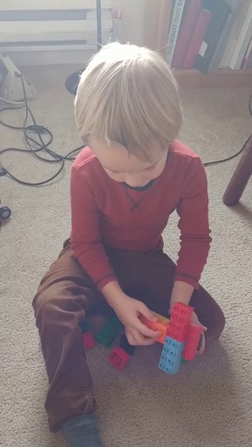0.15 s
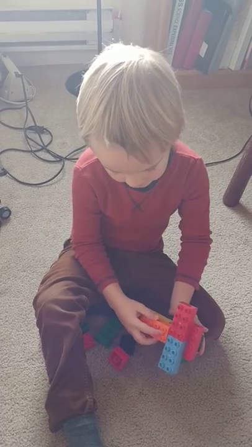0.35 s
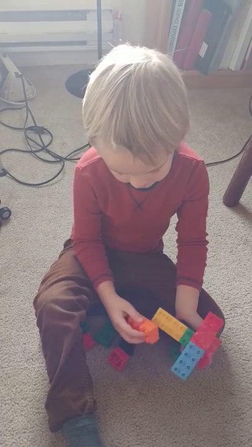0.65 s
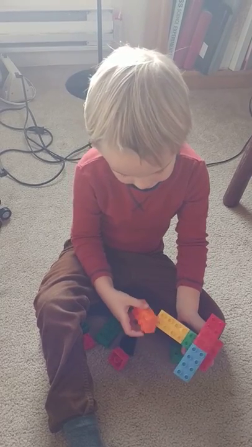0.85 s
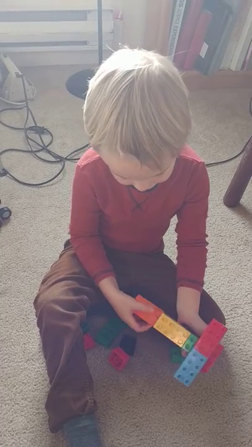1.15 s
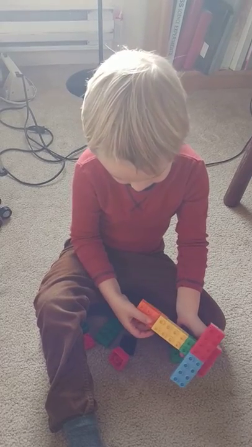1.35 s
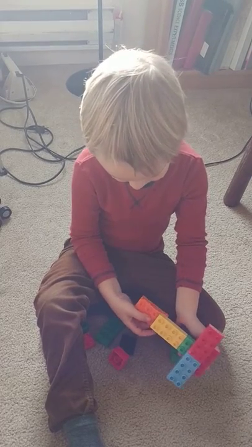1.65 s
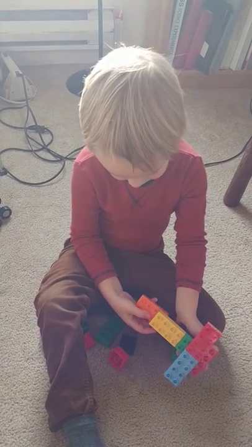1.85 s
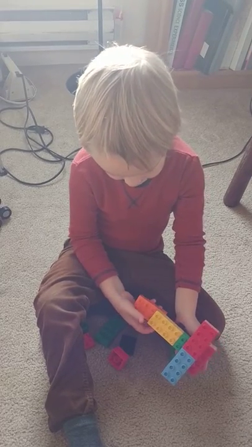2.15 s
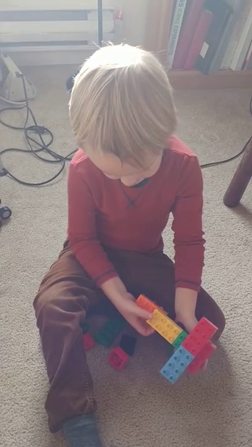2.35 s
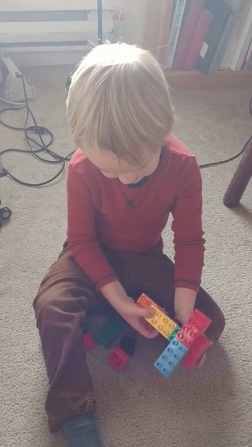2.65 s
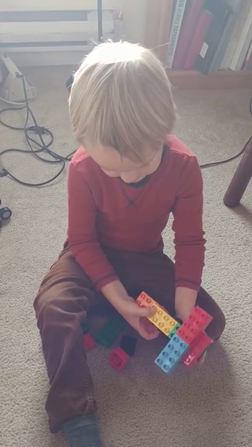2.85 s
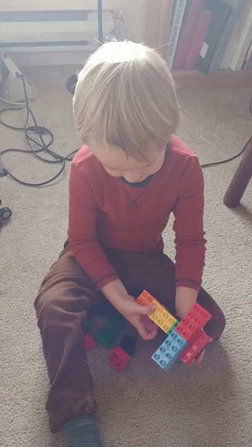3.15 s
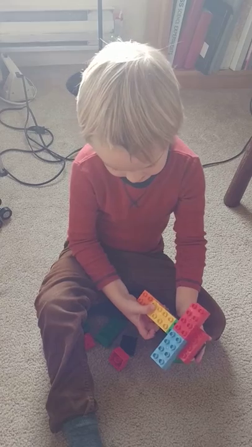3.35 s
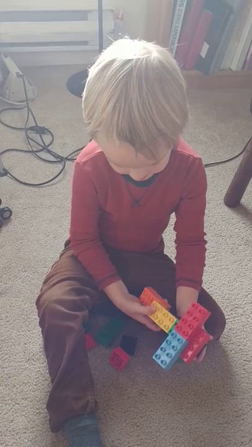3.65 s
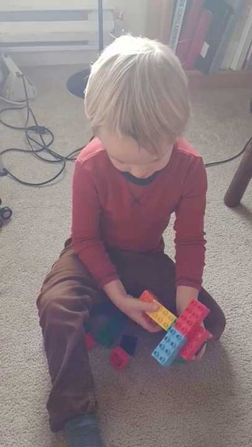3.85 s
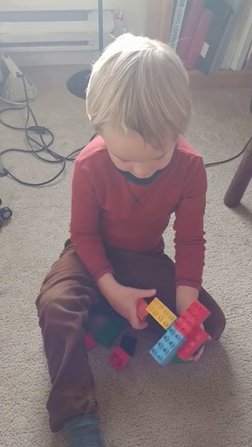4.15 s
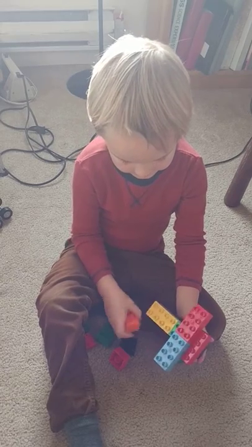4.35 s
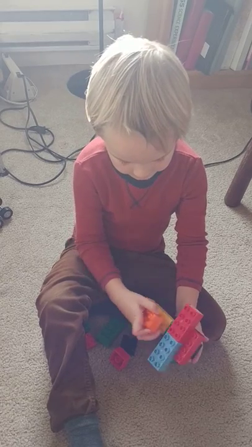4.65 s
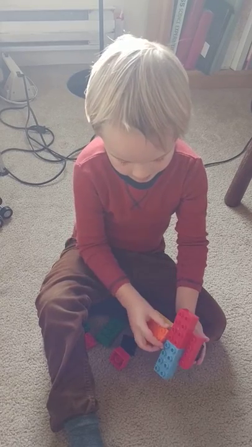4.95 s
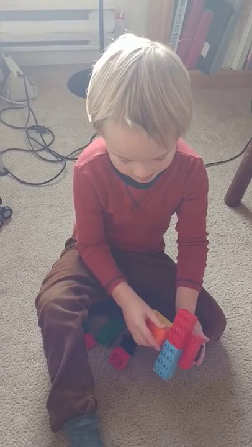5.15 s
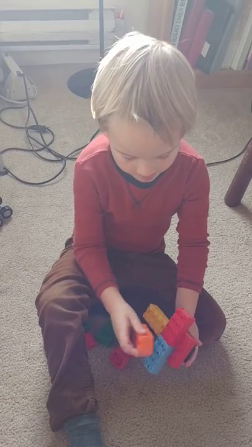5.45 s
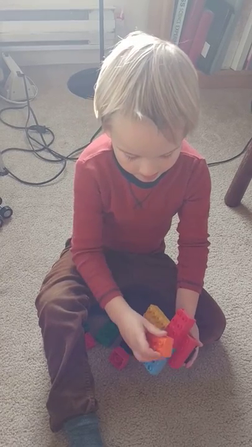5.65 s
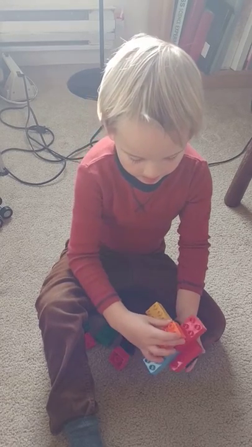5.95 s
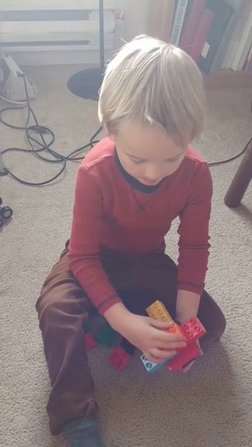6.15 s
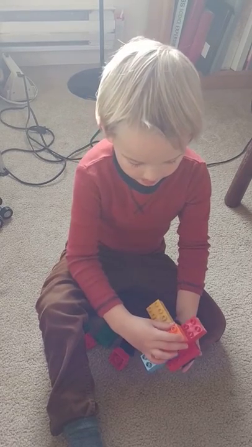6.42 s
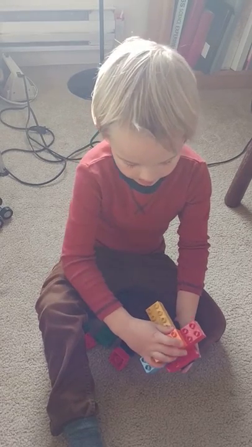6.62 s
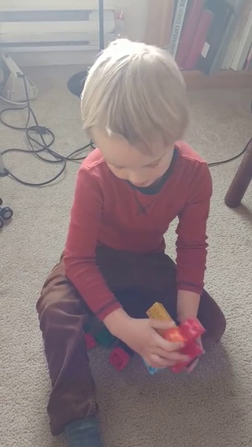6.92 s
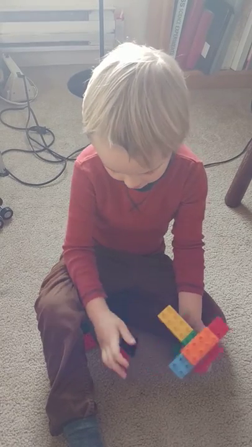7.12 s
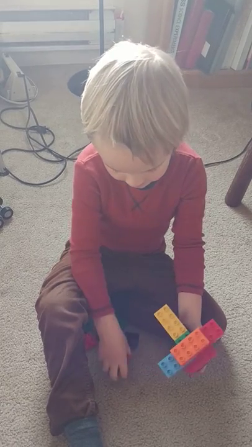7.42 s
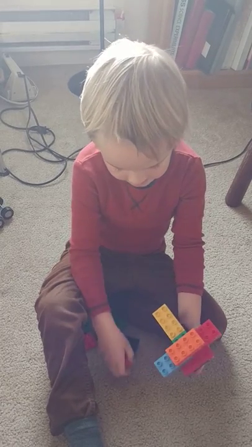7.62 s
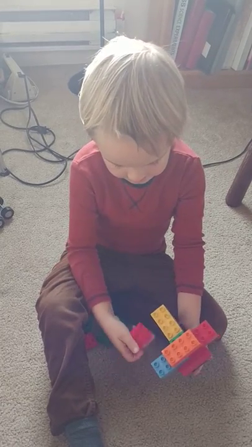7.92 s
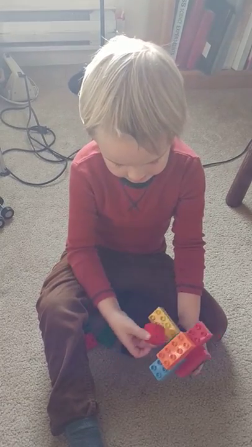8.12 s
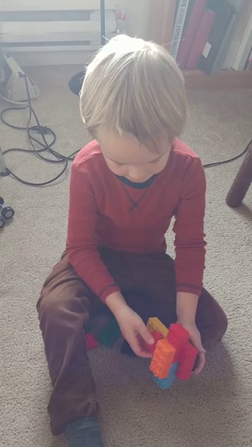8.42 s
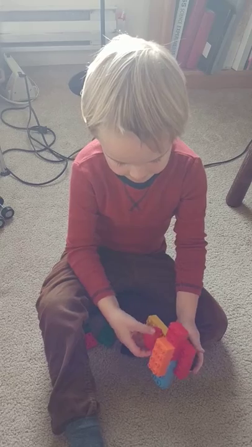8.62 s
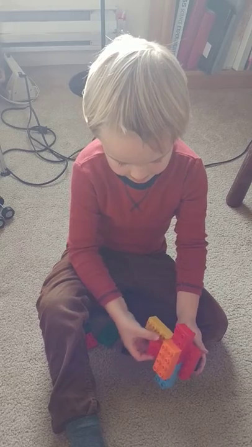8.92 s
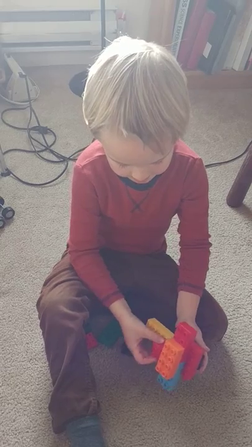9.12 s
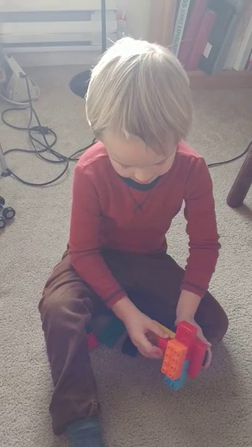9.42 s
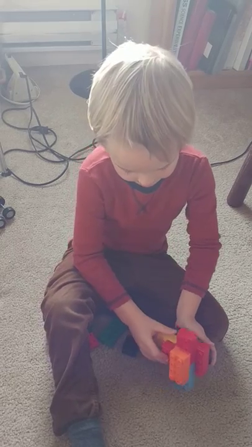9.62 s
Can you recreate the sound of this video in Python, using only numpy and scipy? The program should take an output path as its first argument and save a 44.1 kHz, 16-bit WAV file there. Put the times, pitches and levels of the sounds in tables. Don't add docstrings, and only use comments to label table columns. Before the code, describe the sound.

A quiet small carpeted room holds soft air hiss, a low wavering appliance hum and a faint, thin, wandering whine near 10 kHz on the left. Close to the microphone, large hollow plastic bricks start clacking at 0.5 s, with brisk clicks around 0.8 to 1.0 and hollow knocks from 1.3 to 1.9. A bright sharp crack comes at 2.3, then a low carpet thump at 2.5. Only faint touches follow until clacks at 3.6 to 4.1. The loudest snap, hard and briefly ringing, strikes at 4.86, with another at 4.9 and lighter knocks to 5.2. From 5.8 to 6.9, knocks mix with duller, thudding palm presses. After a lull, a small click at 7.3 and a faint finger hiss at 7.7 lead to soft rubs and clicks at 8.2 to 8.5. Strong clacks return at 8.9 to 9.4, ending with a faint click near 9.7. Each contact stutters and leaves a short, dense room tail.

```python
import sys
import numpy as np
from scipy import signal
from scipy.fft import rfft, irfft, next_fast_len
from scipy.io import wavfile

SR = 44100
rng = np.random.default_rng(int(sys.argv[2]) if len(sys.argv) > 2 else 0)


def convert_level_to_amplitude(level_db):
    exponent = np.asarray(level_db, float) / 20
    return 10 ** exponent


def generate_wav(signal):
    frames = np.transpose(np.atleast_2d(signal))
    scaled = np.clip(frames, -1, 1) * 32767
    pcm = np.round(scaled).astype(np.int16)
    wavfile.write(sys.argv[1], SR, pcm)


N = 431298
SIZE = 2 ** 14
HZ = np.fft.rfftfreq(SIZE, 1 / SR)

# pitch_hz, left_minus_right_db
PORTS = [(300, -1), (1200, 0.5), (2500, -2), (4500, -2), (6500, -8.5), (8200, -12.5), (9000, 10),
         (9900, 17.5), (11200, 14), (13000, 7), (16000, 5)]


def rms_one(x):
    return x / np.sqrt(np.mean(np.abs(x) ** 2) + 1e-30)


def at_hz(points, hz):
    point_hz, value = np.transpose(points)
    return np.interp(np.log(hz + 1), np.log(point_hz), value)


def drift(rate_hz):
    r = np.exp(-2 * np.pi * rate_hz / SR)
    noise = rng.standard_normal(N + SR)
    return rms_one(signal.lfilter([1], [1, -2 * r, r * r], noise)[SR:])


def alike_pair(mid, side, hz):
    # pitch_hz, left_right_likeness (0 to 1)
    likeness = [(40, 1), (130, 0.88), (300, 0.66), (640, 0.45), (1300, 0.076), (15000, 0.3)]
    alike = np.clip(at_hz(likeness, hz), 0, 1)
    return np.sqrt((1 + alike) / 2) * mid + np.sqrt((1 - alike) / 2) * side * [[1], [-1]]


def coloured(left_db, right_db):
    size = next_fast_len(N)
    hz = np.fft.rfftfreq(size, 1 / SR)
    pair = alike_pair(*rfft(rng.standard_normal((2, size))), hz)
    shape = convert_level_to_amplitude([left_db(hz), right_db(hz)]) * np.sqrt(SR / 2)
    return irfft(pair * shape, size)[:, :N]


def air():
    # pitch_hz, level_db (per Hz)
    air_left = [(25, -122), (55, -95.5), (90, -95.5), (300, -97.5), (360, -101), (460, -92.5), (1000, -99),
                (1150, -107), (2600, -113), (5500, -112), (7500, -107), (10400, -108), (13000, -119),
                (15500, -119)]
    air_right = [(25, -122), (55, -84), (90, -102), (300, -97), (360, -101), (460, -93.5), (1000, -98.5),
                 (1150, -105), (2600, -110), (4500, -116), (7500, -116), (9000, -123), (11500, -123),
                 (15500, -121)]
    hiss = coloured(lambda hz: at_hz(air_left, hz), lambda hz: at_hz(air_right, hz))
    return hiss * convert_level_to_amplitude(1.2 * drift(4.5))


def hum():
    # pitch_hz, width_hz, level_db (rms)
    motor_lines = [
        (54.4, 6, -78.5),
        (296.7, 7.2, -79.5),
        (589, 7.9, -71.5),
    ]
    t = np.arange(N) / SR
    total = np.zeros(N)
    for pitch_hz, width_hz, level_db in motor_lines:
        waver = 1 + 1.02 * (drift(width_hz) + 1j * drift(width_hz))
        total += convert_level_to_amplitude(level_db) * np.real(waver * np.exp(2j * np.pi * pitch_hz * t))
    return total


def whine():
    # time_s, pitch_hz
    path = [(0, 10200), (.12, 10030), (.42, 10030), (.75, 9710), (1.6, 9650), (2.1, 9990), (2.5, 10100),
            (2.95, 9610), (3.85, 9830), (4.2, 9680), (5.05, 9740), (5.6, 10120), (5.85, 9760),
            (6.45, 10090), (7.55, 9930), (8.3, 9690), (9.0, 9700), (9.78, 9560)]
    level_db, wander_hz, wobble_hz = -65.5, 55, 80
    time_s, pitch_hz = np.transpose(path)
    hz = np.interp(np.arange(N) / SR, time_s, pitch_hz)
    hz = hz + wander_hz * drift(7) + wobble_hz * (.4 * drift(40) + drift(160))
    tone = np.sqrt(2) * np.sin(2 * np.pi * np.cumsum(hz) / SR)
    tone = tone * convert_level_to_amplitude(level_db + 1.4 * drift(59.63))
    return tone * convert_level_to_amplitude([[0], [-30]])


def mode(pitch_hz, t60_s):
    r = convert_level_to_amplitude(-60 / (t60_s * SR))
    w = 2 * np.pi * pitch_hz / SR
    z = np.exp(-2j * np.pi * HZ / SR)
    return np.sin(w) * z / (1 - 2 * r * np.cos(w) * z + r * r * z * z)


def bands():
    band_edges = 380, 1450, 4500, 9000
    bottom, low, mid, top = band_edges
    shapes = [([bottom, low], "band"), ([low, mid], "band"), ([mid, top], "band"), (top, "high")]
    responses = []
    for edge_hz, kind in shapes:
        sos = signal.butter(3, edge_hz, kind, fs=SR, output="sos")
        responses.append(signal.sosfreqz(sos, HZ, fs=SR)[1])
    return np.array(responses)


def room_answer(parts, room_db, direct=1):
    # pitch_hz, t60_s
    room_t60 = [(400, 0.4), (1500, 0.19), (3000, 0.15), (7000, 0.2), (12000, 0.2)]
    wall_echo_s, wall_echo_db = 0.0097, -6
    tail_db, fill_s, before_wall = 8, 0.0037, 1
    t = np.arange(SIZE) / SR
    t60_s = at_hz(room_t60, np.array([700, 2400, 6300, 12000]))[:, None]
    noise = irfft(rfft(rng.standard_normal((2, 1, SIZE))) * parts)
    fill = np.where(t < wall_echo_s - .002, before_wall, 1) * (1 - np.exp(-t / fill_s))
    decaying = noise * convert_level_to_amplitude(-60 * t / t60_s) / np.sqrt(t60_s * SR / 14)
    tail = decaying.sum(axis=1) * fill
    echo_s = wall_echo_s * rng.uniform(.9, 1.1, (2, 1))
    echo = convert_level_to_amplitude(wall_echo_db) * np.exp(-2j * np.pi * HZ * echo_s)
    return direct + convert_level_to_amplitude(room_db) * (echo * direct + convert_level_to_amplitude(tail_db) * alike_pair(*rfft(tail), HZ))


def brick_ports():
    left_lag_s = 7e-5
    tilt = convert_level_to_amplitude(at_hz(PORTS, HZ) * [[.5], [-.5]])
    return tilt * np.exp(-2j * np.pi * HZ * [[left_lag_s], [0]])


def around_pitch(pitch_hz):
    return (1j * HZ / (1j * HZ + pitch_hz)) ** 2 / (1 + .5j * HZ / pitch_hz)


def add(out, start_s, peak_db, spectrum):
    heard = irfft(spectrum) * np.minimum(1, np.linspace(8, 0, SIZE))
    start = round(start_s * SR)
    energy = np.sqrt(np.sum(heard[:, :SR // 50] ** 2) / 2)
    out[:, start:start + SIZE] += heard / energy * convert_level_to_amplitude(peak_db)


def coloured_contacts(rows, thud_db, mean_tick_db):
    result = []
    for start_s, peak_db, wall_hz, snap_db in rows:
        tick_db = mean_tick_db + 0.8 * (snap_db + 25) - .45 * (peak_db + 30)
        result.append((start_s, peak_db, wall_hz, thud_db, snap_db, tick_db))
    return result


def contacts():
    # start_s, peak_db, wall_hz (loudest wall), snap_db
    slips = [(0.4599, -30.5, 2330, -31.5), (0.931, -29, 2700, -33), (1.0135, -50.5, 2700, -26),
             (2.275, -44.5, 5960, 6), (2.4135, -53.5, 2800, -23.5), (3.262, -46, 2820, -17.5),
             (3.94, -27, 2900, -33), (4.794, -34.5, 2260, -38.5), (4.8502, -34, 2500, -26),
             (4.8586, -21.5, 2410, -27), (5.017, -47.5, 7570, -18.5), (5.0669, -56, 2860, -38),
             (9.021, -34, 2880, -28), (9.0372, -21.5, 2590, -30), (9.7276, -46.5, 2890, -21)]
    touches = [
        (0.4895, -40, 2240, -26),
        (0.8095, -41, 2790, -38),
        (2.2555, -40, 5940, 0),
        (5.7609, -39, 2280, -37),
        (6.379, -43, 4220, -20),
        (6.1395, -35, 2137, -33),
        (9.0295, -30, 2787, -27.5),
    ]
    presses = [(0.4979, -45, 2290, -40), (0.8156, -40, 1700, -34), (1.5169, -49, 2700, -33),
               (1.7417, -44.5, 5400, -19), (1.9607, -55, 2550, -24), (2.5082, -41.5, 6330, -14.5),
               (2.6856, -48.5, 6900, -13), (3.0885, -70, 1220, -21), (4.65, -55, 3050, -30),
               (5.8686, -36, 2210, -36), (5.9805, -34, 2240, -35.5), (6.0994, -45, 2290, -36),
               (6.1508, -32.5, 2770, -21.5), (6.3833, -35, 4330, -18.5), (6.3969, -32.5, 1870, -18),
               (6.494, -37.5, 2460, -22), (6.5834, -36, 1780, -20), (6.6508, -31, 6810, -18.5),
               (6.7679, -37, 3190, -20), (6.939, -44.5, 2460, -23), (8.2194, -41, 1304, -22.5),
               (8.377, -58, 1630, -29), (8.9073, -40.5, 1336, -33), (9.2737, -46, 1720, -25)]
    knocks = [(0.9174, -32.5, 2750, -29), (0.9528, -29, 4090, -25.5), (1.296, -34.5, 2970, -24),
              (1.3038, -31, 2380, -30.5), (1.4133, -36.5, 2500, -37), (1.7642, -31.5, 2780, -23),
              (1.8936, -39.5, 2880, -28), (3.6283, -44.5, 2290, -42), (3.929, -30.5, 2960, -30.5),
              (3.954, -28, 3090, -22), (4.122, -31.5, 2830, -27), (4.129, -26.5, 3120, -25),
              (4.786, -32, 2730, -27), (4.911, -24, 2770, -26), (5.1188, -30, 2710, -27),
              (5.1676, -28.5, 7400, -28), (5.237, -36, 2280, -24), (5.7638, -30.5, 2050, -37),
              (5.7901, -31.5, 2680, -34), (5.922, -28, 2284, -37), (7.3424, -42.5, 3340, -28),
              (8.408, -36, 2755, -31.5), (8.9127, -34, 2090, -29), (8.9566, -25, 2730, -27),
              (9.351, -42.5, 1650, -30), (9.3675, -30, 2770, -21)]
    fumbles = [
        (1.42, -44, 2670, -18),
        (1.694, -54, 2770, -36),
        (2.3937, -57, 2540, -17),
        (3.3388, -56, 1750, -21),
        (3.654, -48, 2340, -11),
        (3.8871, -52.5, 1750, -40),
        (3.8993, -46.5, 2780, -41),
        (4.4982, -56, 3800, -21),
        (4.7643, -47, 6800, -2),
        (8.5131, -52.5, 1560, -28),
    ]
    blows = coloured_contacts(knocks, -16.5, -29.5) + coloured_contacts(presses, -7.5, -22.5)
    blows += coloured_contacts(slips, -22, -30) + coloured_contacts(fumbles, -19, -28.5)
    return sorted(blows) + coloured_contacts(touches, -15.5, -31)


def brick_contacts(parts, ports):
    # pitch_hz, level_db, t60_s
    walls = [(465.7, -7, 0.05), (595, -5, 0.029), (842, 5.5, 0.0091), (1016, -9, 0.04), (1560, -23, 0.016),
             (1700, -4.5, 0.012), (2020, -9.5, 0.012), (2290, -15.5, 0.075), (2460, 5, 0.0045),
             (2770, 0.5, 0.011), (3200, -0.5, 0.0041), (3800, -9, 0.016), (4150, -2.5, 0.0042),
             (4934, -8, 0.0099), (5550, 2.5, 0.0044), (6240, 7, 0.0032), (7140, -3.5, 0.0093),
             (11300, -4, 0.0029), (13030, -3.5, .004)]
    out = np.zeros((2, N + SIZE))
    modes = np.array([convert_level_to_amplitude(level_db) * mode(pitch_hz, t60_s) for pitch_hz, level_db, t60_s in walls])
    for start_s, peak_db, wall_hz, thud_db, snap_db, tick_db in contacts():
        strengths = convert_level_to_amplitude(rng.normal(0, 3.0, len(walls))) * rng.choice([-1, 1], len(walls))
        bare_crack = convert_level_to_amplitude(18)
        body = strengths @ modes + convert_level_to_amplitude(6) * mode(wall_hz, .014) + bare_crack
        lags_s = np.append(0, rng.uniform(.0002, .006, 10))
        sizes = np.append(1, rng.uniform(-0.94, .6, 10)) * np.exp(-lags_s / 0.0043)
        stutter = sizes @ np.exp(-2j * np.pi * lags_s[:, None] * HZ) / np.linalg.norm(sizes)
        split = body * parts
        split = split / np.sqrt(np.mean(np.abs(split) ** 2, axis=1, keepdims=True))
        blow = convert_level_to_amplitude([thud_db + 5.0, 0, snap_db + 24.5, tick_db + 8]) @ split
        add(out, start_s, peak_db + 22.0, blow * room_answer(parts, 0, stutter) * ports)
    return out[:, :N]


def free_walls(parts, ports):
    # start_s, peak_db, pitch_hz, t60_s
    long_wall = [(0.4993, -36, 2253, 0.11), (0.818, -61, 1650, 0.08), (0.916, -44, 2720, 0.06),
                 (1.4204, -44, 2880, 0.04), (1.5209, -45, 2670, 0.023), (3.9399, -53, 2780, 0.06),
                 (4.788, -34.5, 2720, 0.12), (4.8589, -13, 2290, 0.087), (4.9145, -14, 2772, 0.038),
                 (5.1188, -42, 2880, 0.23), (5.2374, -30, 2270, 0.027), (5.764, -27, 2284, 0.072),
                 (5.791, -29.5, 2700, 0.072), (5.9228, -60, 2320, 0.08), (6.1507, -32.5, 2770, 0.064),
                 (6.3961, -37, 1878, 0.065), (8.379, -46, 1560, 0.095), (8.407, -47, 2770, 0.12),
                 (8.5145, -56, 1560, 0.06), (8.959, -20.5, 2800, 0.041), (9.0405, -38, 2650, 0.088),
                 (9.2738, -44.5, 1700, 0.048), (9.3692, -37, 2770, 0.048)]
    short_wall = [(0.816, -38, 3790, 0.027), (4.786, -33, 3850, 0.046), (4.8592, -20, 3800, 0.041),
                  (4.912, -29, 3800, 0.025), (5.018, -57, 7500, 0.035), (5.1705, -32, 7480, 0.041),
                  (5.2365, -33, 6240, 0.029), (6.1494, -32.5, 6590, 0.07), (7.3437, -37, 4403, 0.03),
                  (7.3437, -41.5, 3200, 0.042), (8.515, -54, 2810, 0.047), (8.959, -16.5, 6240, 0.019)]
    out = np.zeros((2, N + SIZE))
    for start_s, peak_db, pitch_hz, t60_s in long_wall + short_wall:
        twins = mode(pitch_hz, t60_s) + 0.28 * mode(pitch_hz * 1.035, .6 * t60_s)
        ring = around_pitch(pitch_hz) * twins
        add(out, start_s, peak_db + 19.5, ring * room_answer(parts, -6.5) * ports)
    return out[:, :N]


def cracks(parts, ports):
    # start_s, peak_db, pitch_hz, t60_s
    crack_events = [(0.932, -22, 3800, 0.005), (1.3043, -28, 2770, 0.0055), (2.262, -41, 6000, .004),
                    (2.2745, -19.5, 6670, 0.0071), (2.5405, -30, 462, 0.03), (3.748, -53, 2950, 0.0077),
                    (4.8592, -10.5, 3090, 0.012), (4.9125, -19.5, 2796, .01), (5.5496, -34, 3460, 0.0019),
                    (6.3976, -34, 4010, 0.003), (8.961, -20.5, 2764, .012), (9.3672, -27, 4500, 0.0028)]
    out = np.zeros((2, N + SIZE))
    for start_s, peak_db, pitch_hz, t60_s in crack_events:
        crack = around_pitch(pitch_hz) * mode(pitch_hz, t60_s)
        add(out, start_s, peak_db + 10.0, crack * room_answer(parts, -11.5) * ports)
    return out[:, :N]


def bricks():
    parts, ports = bands(), brick_ports()
    return brick_contacts(parts, ports) + free_walls(parts, ports) + cracks(parts, ports)


def fingers():
    # start_s, level_db, attack_s, hold_s
    rubs = [
        (7.741, -65, 0.029, 0.027),
        (8.31, -63, .02, 0.044),
        (8.402, -64, .01, .02),
    ]
    # pitch_hz, level_db (per Hz)
    rub_colour = [(1500, -14.5), (3500, -9), (7000, -3.5), (10500, -6.5), (13500, -10.5), (15500, -21.5)]
    fade_db_per_s = 106
    rub = rms_one(coloured(lambda hz: at_hz(rub_colour, hz) + at_hz(PORTS, hz) / 2,
                           lambda hz: at_hz(rub_colour, hz) - at_hz(PORTS, hz) / 2))
    t = np.arange(N) / SR
    level = np.zeros(N)
    for start_s, level_db, attack_s, hold_s in rubs:
        rise = np.clip((t - start_s) / attack_s, 0, 1)
        fading_s = np.maximum(t - start_s - attack_s - hold_s, 0)
        level += rise * convert_level_to_amplitude(level_db - fade_db_per_s * fading_s)
    return rub * level * convert_level_to_amplitude(2.0 * drift(80))


def scene():
    return air() + hum() + whine() + bricks() + fingers()


def band_limit(x):
    return signal.sosfilt(signal.butter(12, 16460, fs=SR, output="sos"), x)


def record(dry):
    # pitch_hz, level_db
    notch = [(7500, 0), (8300, -2), (8700, -7), (8950, -17), (9300, -4), (9900, 1), (11000, 0), (13200, 0),
             (16000, -8)]
    size = next_fast_len(N)
    hz = np.fft.rfftfreq(size, 1 / SR)
    notched = irfft(rfft(dry, size) * convert_level_to_amplitude(at_hz(notch, hz)), size)[:, :N]
    top_cut = signal.cheby2(16, 45, 16500, fs=SR, output="sos")
    mix = signal.sosfilt(top_cut, notched)
    return band_limit(mix)


dry = scene()
out = record(dry)
generate_wav(out)
```